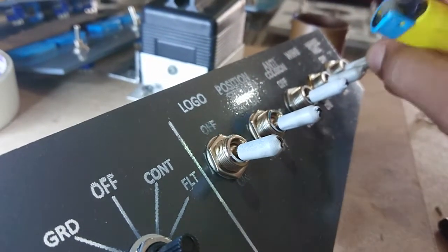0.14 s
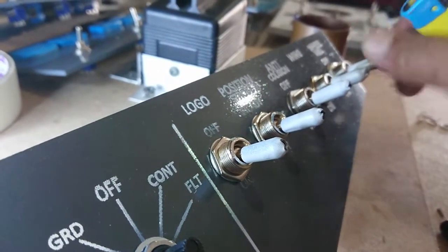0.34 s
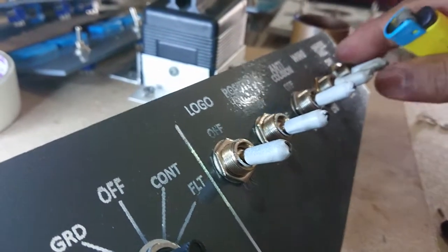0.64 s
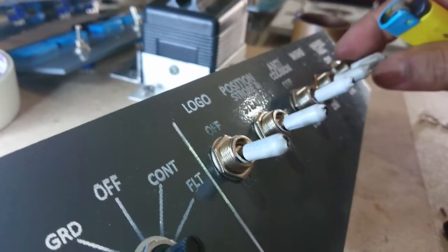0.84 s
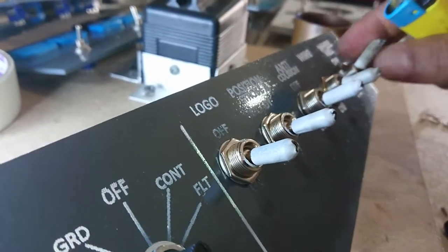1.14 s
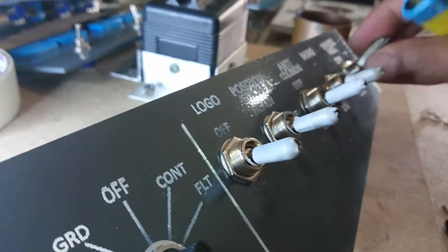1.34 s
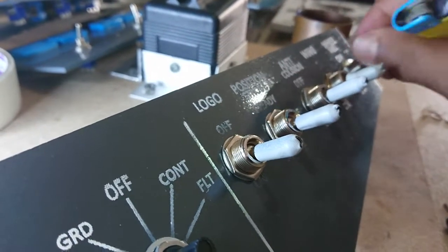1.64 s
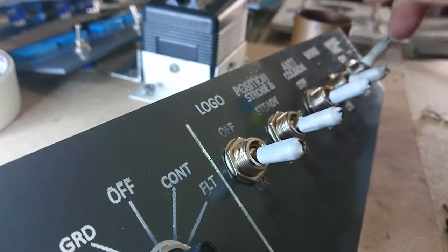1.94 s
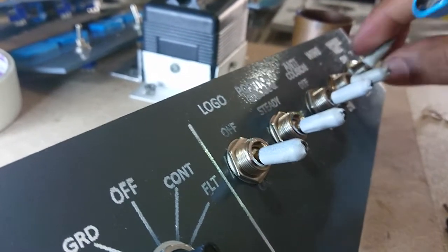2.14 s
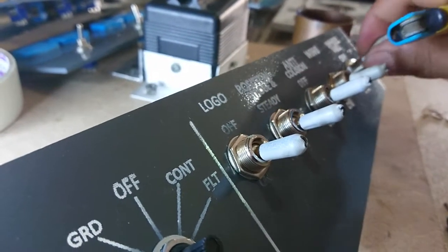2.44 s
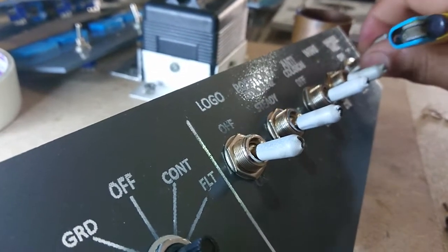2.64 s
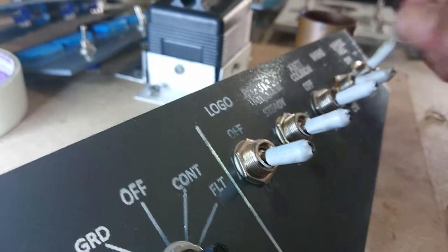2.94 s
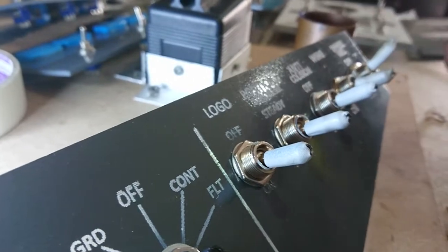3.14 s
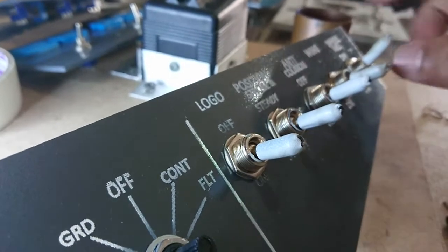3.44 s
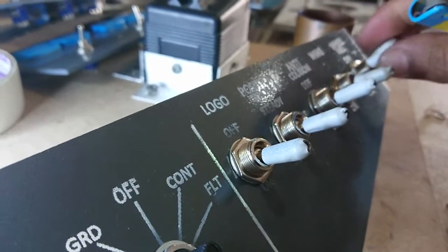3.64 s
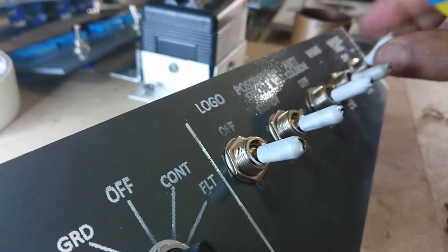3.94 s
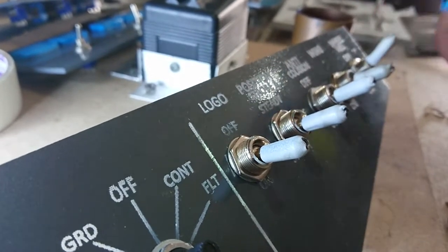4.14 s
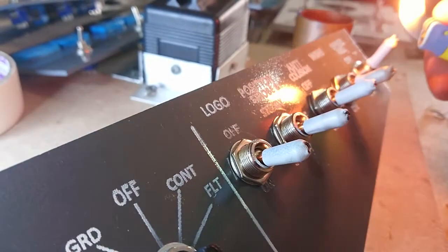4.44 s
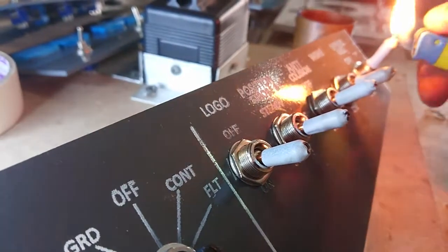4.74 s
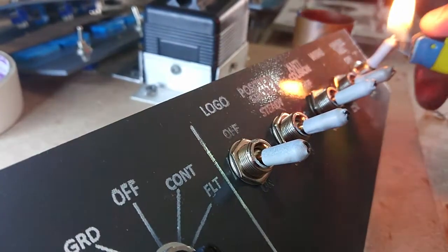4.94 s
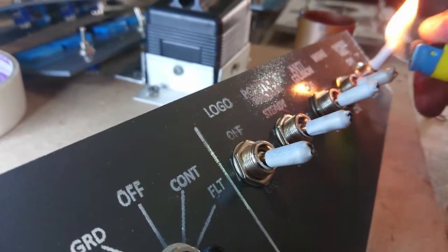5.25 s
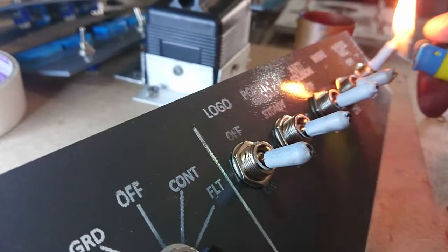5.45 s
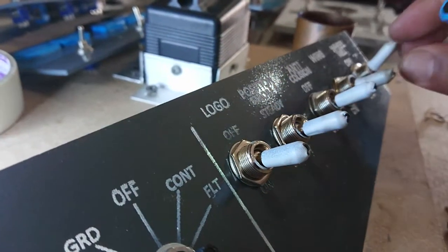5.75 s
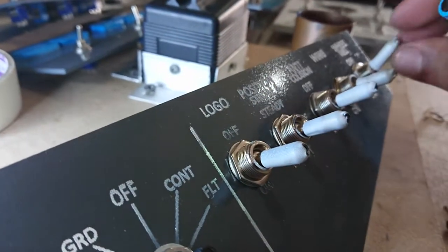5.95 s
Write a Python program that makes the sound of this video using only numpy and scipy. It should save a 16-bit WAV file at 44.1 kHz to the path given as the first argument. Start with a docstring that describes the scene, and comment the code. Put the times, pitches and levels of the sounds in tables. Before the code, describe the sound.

A steady, low, fan-like rush of air fills a small workshop throughout, dark and slightly stronger on the right. Very faint finger ticks come at about 0.5 and 0.7 seconds. At 1.0 a metal toggle switch snaps loudly and close: a bright hard crack, a knock ringing the panel, a short low thump, rebounds within a tenth of a second and a fading rattle, with brief room echo. A small tick follows at 1.4, a light fingertip tap at 1.6, and soft low bumps on the left at 2.3 and 2.7, with a barely audible brush between. At 3.0 a tiny spring tick precedes a second switch click, much softer and duller. At 4.32 a flint wheel begins rolling, rasping sharply into a key snap at 4.38; very faint gas hiss thins out until 5.6. Small ticks and a faint bump come near 5.6 and 5.9.

```python
"""In a small workshop, two metal toggle switches are flicked on a panel on a bench, then a flint lighter is struck.
Each switch is a noise burst for the snap, a knock that rings the panel, two rebounds, a rattle and a low thump.
The lighter is noise cut up by the wheel's teeth, which rings the steel; its key snaps down and gas hisses.
Small ticks come from fingers and one from a switch's spring, with a tap and a brush. The close sounds echo in
the room, and a fan-like rush of air, made of coloured noise, fills it."""
import sys
import numpy as np
from scipy import signal
from scipy.fft import rfft, irfft, next_fast_len
from scipy.io import wavfile
from scipy.ndimage import uniform_filter1d

SR = 44100
rng = np.random.default_rng(int(sys.argv[2]) if len(sys.argv) > 2 else 0)


def put_to_file(sound):
    """Save the sound as 16-bit audio at rate SR, in the file named by the first command-line argument."""
    columns = np.atleast_2d(sound).T  # one column per channel
    safe = np.clip(columns, -1, 1)
    whole_steps = np.round(safe * 32767)
    wavfile.write(sys.argv[1], SR, whole_steps.astype(np.int16))


N = 268348

# The two switch throws. Each row: start in seconds, snap level in dB, treble tilt in dB per octave,
# lever travel in seconds, knock level in dB, panel ringing in dB, rebound gap in seconds, rebound level in dB,
# thump level in dB, thump left-right difference in dB (positive: left is louder).
SWITCH_FLICKS = [(1.0265, -15.5, -2.5, .004, -8.5, -15.5, .0445, -34, -13, -6),
                 (2.9938, -27.5, -3.8, 0.001005, -18.5, -25.5, .0138, -46, -16, 3)]
# The tone colour of small hard parts snapping. Each row: frequency in Hz, relative strength in dB per Hz.
SNAP_SPECTRUM = [(200, -14.5), (900, -12), (1800, -3), (2600, 3), (3100, -1.5), (3700, -2.5), (4800, -7.5),
                 (5700, -13.5), (7000, -20), (8700, -14.5), (9800, -23), (12500, -26.5), (16000, -39.5)]
# The lighter, in seconds: the thumb starts to roll the wheel, the flint bites, the thumb lands on the gas key.
ROLL_S, BITE_S, KEY_S = 4.318, 4.3525, 4.378


def from_db(db):
    """Turn decibels into gain."""
    return 10 ** (np.asarray(db) / 20)


def rms_one(x):
    """Scale a sound to an average strength (rms) of 1."""
    return x / np.sqrt(np.mean(x ** 2) + 1e-20)


def at_hz(points, hz):
    """Read a table of frequencies and values, spacing the frequencies as the ear does (log scale)."""
    knots, values = np.transpose(points)
    return np.interp(np.log(hz + 1), np.log(knots), values)


def sides(balance_db):
    """Left and right gains for a level difference; positive makes the left louder."""
    return from_db(np.array([[.5], [-.5]]) * balance_db)


def add(out, s, sound):
    """Mix a sound in at time s, in seconds."""
    start = round(s * SR)
    out[:, start:start + sound.shape[-1]] += sound[..., :N - start]


def fade(t60, size):
    """Dying away at a steady rate: 60 dB down after t60 seconds."""
    return np.exp(-np.log(1000) * np.arange(size) / SR / t60)


def colour_gain(colour, hz, tilt_db):
    """Gain at each frequency for a tone colour, tilted by some dB per octave."""
    return from_db(at_hz(colour, hz) + tilt_db * np.log2(hz + 1))


def noise(colour, size, tilt_db=0):
    """Coloured noise, unrelated on the two sides; rms 1."""
    gain = colour_gain(colour, np.fft.rfftfreq(size, 1 / SR), tilt_db)
    return rms_one(irfft(rfft(rng.standard_normal((2, size))) * gain, size))


def diffuse(echoes, order=45):
    """Many paths carry all pitches about equally: even out the colour of a cloud of echoes."""
    size = echoes.shape[-1]
    spectrum = rfft(echoes, 2 * size)
    power = uniform_filter1d(np.abs(spectrum) ** 2, 2 * order)
    return rms_one(irfft(spectrum / np.sqrt(power + 1e-12))[:, :size])


def burst(colour, decay_s, tilt_db=0):
    """Small hard parts ring in many close modes that die together; a longer decay carries more energy."""
    size = 16384
    hz = np.abs(np.fft.fftfreq(size, 1 / SR))
    log_gain = np.log(colour_gain(colour, hz, tilt_db))
    # minimum phase: nothing sounds early
    causal = np.exp(np.conj(signal.hilbert(log_gain)))[:size // 2 + 1]
    shape = fade(decay_s, size)
    cloud = diffuse(rng.standard_normal((2, size)) * shape, order=160)
    # the second fade makes the cloud die a little faster than decay_s alone
    cloud = cloud * fade(3 * decay_s, size)
    rise = 1 - fade(.003, size)
    coloured = irfft(rfft(cloud * rise) * causal, size)
    return rms_one(coloured) * np.sqrt(np.mean(shape ** 2))


def switches():
    """The spring throws the contacts over, the lever hits its stop and rebounds, and the other levers rattle."""
    snap_decay_s, snap_pan_db = .015, -.5
    rebounds, rebound_loss_db, rebound_decay_s, rebound_tilt_db = 2, 6, 0.023, -2.5
    out = np.zeros((2, N))
    for s, snap_db, tilt_db, travel_s, knock_db, ring_db, gap_s, rebound_db, _, _ in SWITCH_FLICKS:
        snap = burst(SNAP_SPECTRUM, snap_decay_s, tilt_db)
        add(out, s, from_db(snap_db) * sides(snap_pan_db) * snap)
        add(out, s + travel_s, knock(knock_db, ring_db, swing_hz=1002, length_ms=0.42, lag_ms=0.27))
        for k in range(rebounds):
            bounce = burst(SNAP_SPECTRUM, rebound_decay_s, rebound_tilt_db)
            add(out, s + (k + 1) * gap_s, from_db(rebound_db - k * rebound_loss_db) * bounce)
        out += rattle(s, snap_db, tilt_db)
    return out


def knock(level_db, ring_db, swing_hz, length_ms, lag_ms, spread_db=4.5, modes_apart=1.0):
    """A blow is one short swing of pressure; then the panel rings, its higher modes out of step on the two sides."""
    # What the panel rings with. Each row: frequency in Hz, level in dB before a random spread,
    # time to fall by 60 dB in seconds.
    panel_modes = [(226, -17, .07), (335, -10, .045), (520, -17, .03), (700, -14, .03), (812, -12, .045),
                   (980, -15, .025), (1118, -14, .055), (1490, -14, .06), (1730, -15, .05),
                   (1997, -17, .06), (2170, -18, .04), (2396, -20, .08), (2682, -16, .07), (2830, -22, .07),
                   (3009, -24, .08), (3150, -24, .08), (3255, -23, .08), (3395, -21, .06), (4460, -27, .07)]
    size = SR // 3
    # a positive lag makes the right side late, a negative one the left
    lag_s = np.maximum([[-lag_ms], [lag_ms]], 0) / 1000
    t = np.maximum(np.arange(size) / SR - lag_s, 0)
    age = t * 1000 / length_ms
    swing = np.sin(2 * np.pi * swing_hz * t) * age * np.exp(1 - age)
    ring = np.zeros((2, size))
    for k, (hz, mode_db, t60) in enumerate(panel_modes):
        strength = from_db(mode_db + spread_db * rng.standard_normal((2, 1)))
        phase = modes_apart * min(hz / 1500, 1) * rng.standard_normal((2, 1))
        # every other mode starts the opposite way
        ring += (-1) ** k * strength * np.sin(2 * np.pi * hz * t + phase) * fade(t60, size)
    return from_db(level_db) * swing + from_db(ring_db) * ring * (1 - np.exp(-age))


def rattle(s, snap_db, tilt_db, count=9):
    """The other levers chatter unevenly after a snap, ever more weakly."""
    # mean gap, first level against the snap, loss for each doubling of the count
    gap_s, first_db, loss_db = .007, -9.5, 7
    decay_s, extra_tilt_db, pan_db = 0.026, 1.7, 1.5   # tilt in dB per octave against the snap
    out = np.zeros((2, N))
    for k, jitter in enumerate(rng.uniform(-.25, .25, count), 1):
        gain = from_db(snap_db + first_db - loss_db * np.log2(k))
        chatter = burst(SNAP_SPECTRUM, decay_s, tilt_db + extra_tilt_db)
        add(out, s + (k + jitter) * gap_s, gain * chatter)
    return sides(pan_db) * out


def low_bumps(grip_pan_db):
    """Each flick rocks the panel, which settles again; hands bump the bench and the lighter thuds in the grip."""
    # Low tones of the whole panel, of a soft bump on the bench, and of the lighter pushed into the hand.
    # Each row: frequency in Hz, level in dB, time to fall by 60 dB in seconds.
    panel_thump = [(341, 0.5, 0.031), (124, -14.5, 0.064)]
    bench_modes = [(66.2, -6.5, .3), (82, 0, .15), (106.3, 0, 0.13)]
    grip_modes = [(185, -13, 0.016), (391, -33.5, 0.11)]
    # Hands bumping the bench. Each row: start in seconds, level in dB, left-right difference in dB.
    hand_bumps = [(2.298, -39, 18.5), (2.674, -43.5, 19), (5.897, -47, 4)]
    thump_lag_s = 0.0026   # the whole panel gives way just after the knock
    settle_lag_s, settle_db, settle_pan_db = 0.0238, -31, 3.5   # and drops back on the bench
    thumb_lag_s = .019   # the body of the lighter is pushed into the hand
    out = np.zeros((2, N))
    for s, _, _, travel_s, _, _, _, _, thump_db, pan_db in SWITCH_FLICKS:
        add(out, s + travel_s + thump_lag_s, from_db(thump_db) * sides(pan_db) * thud(panel_thump))
        add(out, s + travel_s + settle_lag_s, from_db(settle_db) * sides(settle_pan_db) * thud(bench_modes))
    for s, level_db, pan_db in hand_bumps:
        add(out, s, from_db(level_db) * sides(pan_db) * thud(bench_modes))
    add(out, KEY_S + thumb_lag_s, sides(grip_pan_db) * thud(grip_modes))
    return out


def thud(modes, rise_s=0.0041):
    """A soft low bump: a few damped swings that start gently."""
    t = np.arange(SR // 2) / SR
    swings = 0
    for hz, mode_db, t60 in modes:
        swings = swings + from_db(mode_db) * np.sin(2 * np.pi * hz * t) * fade(t60, len(t))
    return swings * (1 - np.exp(-t / rise_s))


def lighter(teeth_per_s, tooth_t60, grind, ring_db, pan_db):
    """The wheel's teeth bite the flint in quick uneven succession and the steel rings; then the gas hisses."""
    # Tone colours of the scraped flint and the gas. Each row: frequency in Hz, relative strength in dB per Hz.
    flint_spectrum = [(300, -10), (1500, 4.5), (2800, 0), (3600, 9), (4400, 1.5), (5400, 8.5), (6800, -3.5),
                      (8200, -1), (9600, -5), (10800, -17), (12800, -12), (14200, -28), (16000, -23)]
    gas_spectrum = [(1200, -18), (2400, 6), (3200, 12), (4200, -3), (5300, -0.5), (6800, -17.5),
                    (8200, -20), (10500, -35), (14000, -32)]
    # What the steel wheel and hood ring with. Each row: frequency in Hz, relative level in dB,
    # time to fall by 60 dB in seconds.
    wheel_modes = [(3620, 0, .05), (4560, -15, .3), (5071, -14, .25), (5380, -6, .025), (5950, -9, .04),
                   (7865, -13, .08)]
    count = 400
    bites = np.zeros(N)
    at = ROLL_S + np.cumsum(rng.uniform(.5, 1.5, count)) / teeth_per_s
    bites[np.minimum((at * SR).astype(int), N - 1)] = rng.uniform(0.67, 1, count)
    # each bite dies away, over a steady grind
    grain = signal.lfilter([1], [1, -fade(tooth_t60, 2)[1]], bites + 1e-18) + grind
    grain /= np.sqrt(np.mean(grain[int(at[0] * SR):int(at[-1] * SR)] ** 2))
    scrape = noise(flint_spectrum, next_fast_len(N))[:, :N] * wheel_force() * grain
    steel = 0
    for hz, mode_db, t60 in wheel_modes:
        r = fade(t60, 2)[1]   # what is left of the ringing after one sample
        resonator = [1, -2 * r * np.cos(2 * np.pi * hz / SR), r * r]
        mode = signal.lfilter([1, 0, -1], resonator, scrape + 1e-18)
        steel = steel + from_db(mode_db + ring_db) * rms_one(mode) * np.std(scrape)
    gas = noise(gas_spectrum, next_fast_len(N))[:, :N] * gas_flow()
    return sides(pan_db) * (scrape + steel + gas)


def wheel_force():
    """The wheel rolls lightly, then grinds harder and harder in jerks until the thumb slips off it."""
    roll_db, roll_length_s = -68, .022
    rasp_db, rise_db_per_s, fall_db_per_s = -31, 680, 1900
    overrun_s = 0.001   # the rasp is loudest just after the key goes down
    # the wheel catches and slips before it spins freely
    catches, catch_gap_s, catch_depth_db = 2, .0105, 14
    t = np.arange(N) / SR
    rolled = (t - ROLL_S) / roll_length_s
    roll = from_db(roll_db) * np.sqrt(np.clip(rolled, 0, 1)) * (rolled < 1)
    late_s = t - KEY_S - overrun_s
    push_db = rasp_db - np.maximum(-rise_db_per_s * late_s, fall_db_per_s * late_s)
    catching = t < BITE_S + catches * catch_gap_s
    slip_db = catch_depth_db * ((t - BITE_S) / catch_gap_s % 1) * catching
    return roll + from_db(np.maximum(push_db - slip_db, -200)) * (t > BITE_S)


def gas_flow():
    """The valve opens with the key; the flow sags slowly until the key is let go."""
    level_db, sag_db_per_s = -68.5, 5
    open_length_s, off_s, close_length_s = .12, 5.58, .04
    t = np.arange(N) / SR
    opening = np.clip((t - KEY_S) / open_length_s, 0, 1)
    closing = np.clip(1 - (t - off_s) / close_length_s, 0, 1)
    return opening * closing * from_db(level_db - sag_db_per_s * (t - KEY_S))


def gas_key(snap_db, pan_db):
    """The thumb lands on the lighter's key, which snaps down."""
    out = np.zeros((2, N))
    add(out, KEY_S, knock(level_db=-18.5, ring_db=-41, swing_hz=625, length_ms=.25, lag_ms=-0.088))
    snap = burst(SNAP_SPECTRUM, decay_s=0.0056, tilt_db=-3.5)
    add(out, KEY_S, from_db(snap_db) * sides(pan_db) * snap)
    return out


def small_ticks_and_touches(nail_db, slide_db):
    """Small hard contacts: a few clear ticks, fainter ones at random, one tap on the panel and one brush."""
    # Small ticks: fingers and nails on levers and lighter, and at 2.988 the second switch's spring clicking
    # just before its snap. Each row: start in seconds, level in dB, treble tilt in dB per octave.
    clear_ticks = [(.5378, -63, -2), (.715, -63, -1), (1.009, -54, -1), (1.4193, -51.5, -4.5),
                   (2.968, -61, 3), (2.988, -43, -4.5), (4.7137, -59, 6), (5.5863, -58, 0.5),
                   (5.8861, -64, -1)]
    # The tone colour of a tick. Each row: frequency in Hz, relative strength in dB per Hz.
    tick_spectrum = [(300, -8), (1500, -14.5), (3000, 8), (5200, 7), (6800, -8), (8200, -0.5),
                     (10000, -17.5), (12500, -27.5), (15000, -19.5)]
    tap_s, slide_s = 1.643, 2.38   # a fingertip lands on the panel; one brushes along a lever
    faint_per_s, faint_db, faint_decay_s = 1.2, -71, .07   # the grip shifts
    out = np.zeros((2, N))
    for s, level_db, tilt_db in clear_ticks:
        add(out, s, from_db(level_db) * burst(tick_spectrum, decay_s=0.035, tilt_db=tilt_db))
    add(out, tap_s, knock(level_db=-37.5, ring_db=-46, swing_hz=840, length_ms=0.43, lag_ms=.1))
    add(out, tap_s, from_db(nail_db) * burst(tick_spectrum, decay_s=.08, tilt_db=-4.0))
    add(out, slide_s, from_db(slide_db) * burst(tick_spectrum, decay_s=.2, tilt_db=4.0))
    count = 16
    for s in np.cumsum(rng.uniform(.2, 1.8, count)) / faint_per_s:
        tick = from_db(faint_db) * burst(tick_spectrum, faint_decay_s, tilt_db=-1.0)
        if s < N / SR:
            add(out, s, tick)
    return out


def workshop(x, bench_db, bench_t60, tail_db, tail_t60, treble_t60, wall_hz):
    """Quick scatter from the bench and its clutter, then the room's tail, whose treble dies sooner."""
    size = SR * 2 // 3
    t = np.arange(size) / SR
    near, far = rng.standard_normal((2, 2, size))
    low = signal.sosfilt(signal.butter(2, wall_hz, fs=SR, output="sos"), far)
    near = near * fade(bench_t60, size) * (t > .003)
    far = (low * fade(tail_t60, size) + (far - low) * fade(treble_t60, size)) * (t > .009)
    echoes = from_db(bench_db) * diffuse(near) + from_db(tail_db) * diffuse(far)
    mid, side = echoes / np.sqrt(size)
    # long waves reach both sides alike
    side = signal.sosfilt(signal.butter(1, 700, "high", fs=SR, output="sos"), side)
    both = np.array([mid + side, mid - side]) / np.sqrt(2)
    return signal.fftconvolve(x, both, axes=1)[:, :N]


def air():
    """Steady rush of air through a few resonances, alike on both sides in the bass and diffuse in the treble."""
    # The tone colour of the rush. Each row: frequency in Hz, relative strength in dB per Hz.
    air_spectrum = [(22, -32.5), (47, -10.5), (110, -9), (150, -11), (230, -6), (450, -11.5), (740, -12.5),
                    (1000, -20), (1500, -18), (2300, -26.5), (3000, -32), (4800, -41.5), (6800, -59),
                    (10500, -76.5)]
    # Resonances on top of it. Each row: centre in Hz, width in Hz, boost in dB.
    air_resonances = [(209, 52, 7), (298.2, 46, 5), (370, 57, 6.5), (7800, 1000, 10.5), (9000, 900, 8)]
    # How alike the two sides are. Each row: frequency in Hz, likeness (1 same, 0 unrelated, -1 opposite;
    # limited below to 0.95 either way).
    side_likeness = [(60, 0.8), (130, 0.8), (290, 1.3), (640, 0.36), (1410, -0.32), (3100, 0.05), (7000, 0)]
    # Which side is louder. Each row: frequency in Hz, left-right difference in dB.
    side_balance = [(60, 0), (110, -1), (200, -4.5), (380, -2.5), (700, -4.5), (1290, -3), (2380, -1.5),
                    (4400, 2), (8000, 1), (15000, 0)]
    level_db = -45
    size = next_fast_len(N)
    hz = np.fft.rfftfreq(size, 1 / SR)
    mid, side = rfft(rng.standard_normal((2, size)))
    alike = np.clip(at_hz(side_likeness, hz), -.95, .95)
    both = np.sqrt(1 + alike) * mid + np.sqrt(1 - alike) * side * [[1], [-1]]
    peaks_db = 0
    for centre, width, boost_db in air_resonances:
        peaks_db = peaks_db + boost_db * .5 ** ((2 * (hz - centre) / width) ** 2)
    colour = from_db(at_hz(air_spectrum, hz) + peaks_db) * sides(at_hz(side_balance, hz))
    return from_db(level_db) * rms_one(irfft(both * colour, size)[:, :N])


def scene():
    """Close handling sounds and their room echo, with low bumps and the air added."""
    touches = small_ticks_and_touches(nail_db=-56.5, slide_db=-76)
    close = switches() + touches + gas_key(snap_db=-34, pan_db=-7)
    close = close + lighter(teeth_per_s=750, tooth_t60=0.0044, grind=0.39, ring_db=-21, pan_db=0.5)
    room = workshop(close, bench_db=-7.0, bench_t60=0.057, tail_db=-15.0, tail_t60=0.54,
                    treble_t60=0.46, wall_hz=5000)
    return close + room + low_bumps(grip_pan_db=-3.5) + air()


def ports(x, port_hz, width_hz, right_db):
    """The right microphone port rings in the treble, which boosts a band around port_hz."""
    b, a = signal.iirpeak(port_hz, port_hz / width_hz, fs=SR)
    ringing = signal.lfilter(b, a, x[1])
    return np.array([x[0], x[1] + (from_db(right_db) - 1) * ringing])


def record(dry):
    """The microphones colour the treble and shed the deepest bass; the top is cut steeply."""
    cutoff_hz = 15800
    heard = ports(dry, port_hz=8350, width_hz=1400, right_db=6.0)
    lean = signal.sosfilt(signal.butter(6, 38, "high", fs=SR, output="sos"), heard)
    return signal.sosfilt(signal.ellip(10, .1, 80, cutoff_hz, fs=SR, output="sos"), lean)


dry = scene()
out = record(dry)
put_to_file(out)
```